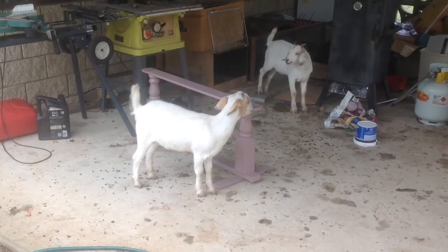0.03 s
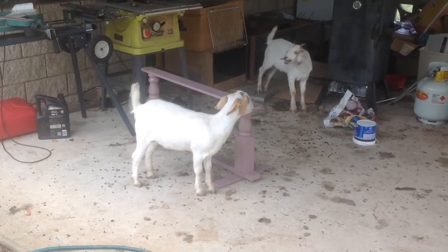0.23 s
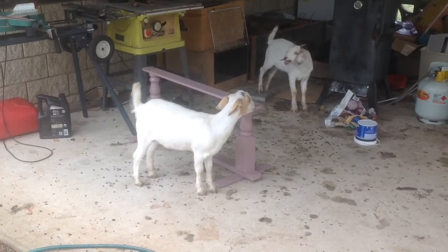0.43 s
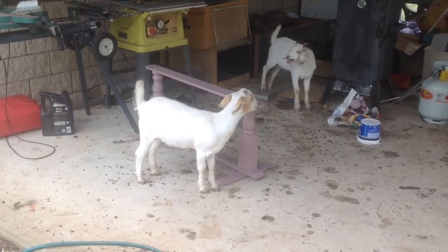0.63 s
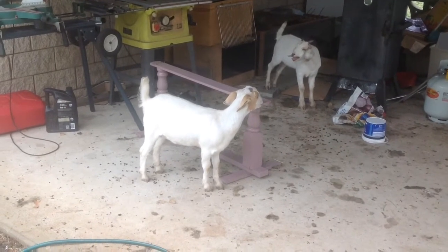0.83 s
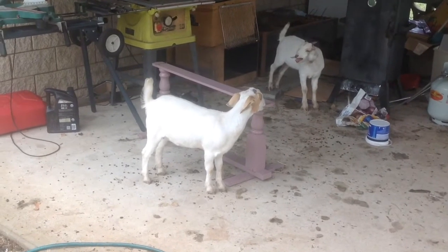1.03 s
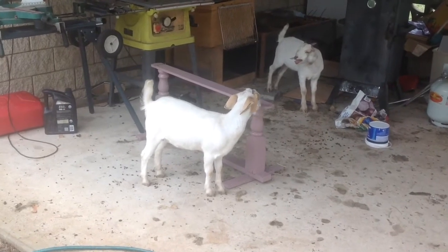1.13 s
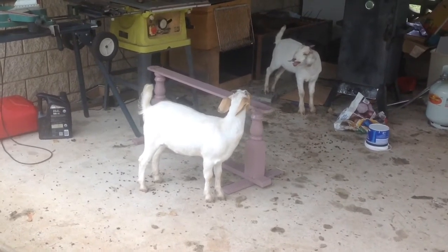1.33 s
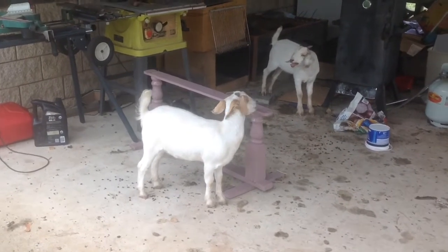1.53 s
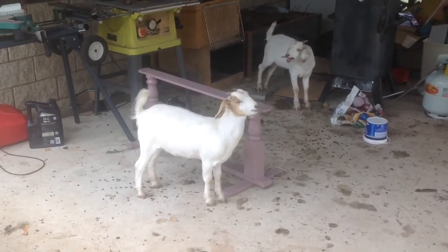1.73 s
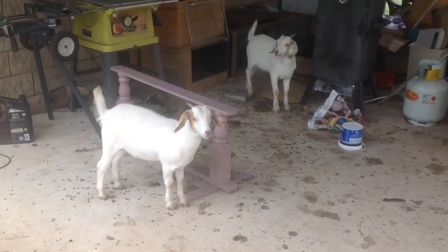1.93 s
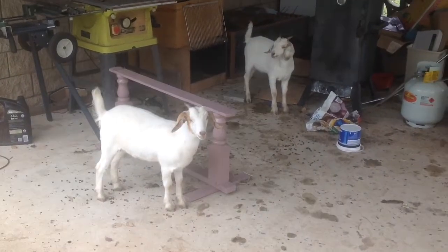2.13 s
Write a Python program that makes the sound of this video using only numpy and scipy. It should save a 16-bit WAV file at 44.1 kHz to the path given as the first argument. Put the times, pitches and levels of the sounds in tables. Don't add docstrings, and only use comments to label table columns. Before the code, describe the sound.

Close, slightly overloaded camera sound of a goat bleating like a scream, hoarse and squealing before breaking into a sustained nasal wail, with short wall reflections, faint machine hum, then a sudden drop to near quiet and a faint rasp.

```python
import sys
import numpy as np
from scipy import signal
from scipy.fft import rfft, irfft, next_fast_len
from scipy.io import wavfile
from scipy.ndimage import uniform_filter1d, map_coordinates

SR = 44100
rng = np.random.default_rng(int(sys.argv[2]) if len(sys.argv) > 2 else 0)


def wav_out(sig):
    wavfile.write(sys.argv[1], SR, np.round(np.clip(np.atleast_2d(sig).T, -1, 1) * 32767).astype(np.int16))


def volts_from_decibels(level):
    exponent = np.asarray(level, float) / 20
    return 10 ** exponent


N = 97020


def unit(x):
    return x / np.sqrt(np.mean(x ** 2) + 1e-20)


def along(points, hz):
    f, value = np.transpose(points)
    return np.interp(np.log(hz + 1), np.log(f + 1), value)


def curves(rows):
    s, *columns = np.transpose(rows)
    return [np.interp(np.arange(N) / SR, s, column) for column in columns]


def wobble(rate):
    knots = rng.standard_normal(int(N * rate / SR) + 4)
    return map_coordinates(knots, [np.arange(N) * rate / SR])


def filtered(x, response):
    m = next_fast_len(N + SR // 2)
    return irfft(rfft(x, m) * response(np.fft.rfftfreq(m, 1 / SR)), m)[..., :N]


def peak(f, hz, width):
    return 1j * f * width / (hz * hz - f * f + 1j * f * width)


def turning(hz, rough=0):
    jitter = 0.0012 * wobble(60.1) + 0.044 * rough * wobble(110)
    return 2 * np.pi * np.cumsum(hz * (1 + jitter)) / SR


def folds(phase, levels_db, rough=0, drift_db=3):
    pulses = 0
    for k, db in enumerate(levels_db):
        drift = drift_db * (k > 1) * (wobble(13.94) + 0.64 * wobble(45.01))
        lag = k * k * (0.303 + 0.00078 * wobble(100))
        pulses = pulses + volts_from_decibels(db + drift) * np.cos((k + 1) * phase + lag)
    scatter = 1 + 0.57 * rough * wobble(130)
    shimmer = volts_from_decibels(0.5 * wobble(39.68))
    return unit(pulses) * scatter * shimmer


def room():
    # f/Hz, level/dB per Hz
    room_colour = [(35, -105), (60, -88), (102, -9), (142, -10.5), (236, -4.5), (272, -18), (1290, -14),
                   (1700, -20.5), (15400, -39.5)]
    noise = unit(filtered(rng.standard_normal(N), lambda f: volts_from_decibels(along(room_colour, f)))) * volts_from_decibels(wobble(12))
    hum_hz = 117 + 2 * wobble(4.3)
    hum = np.sin(2 * np.pi * np.cumsum(hum_hz) / SR) * volts_from_decibels(4.1 * wobble(11))
    return volts_from_decibels(-39) * noise + volts_from_decibels(-43) * hum


def echo():
    # f/Hz, level/dB per Hz
    echo_colour = [(150, -60), (250, -11.5), (842, -7.5), (1040, -15.5), (1260, -22), (2330, -43),
                   (9000, -50), (11700, -77.5), (19800, -120)]
    t60 = 3.85
    tail = unit(filtered(rng.standard_normal(N), lambda f: volts_from_decibels(along(echo_colour, f))))
    return tail * volts_from_decibels(-44.5 - 60 * np.arange(N) / SR / t60 + 5.64 * wobble(15))


def air():
    # t/s, level/dB
    air_rows = [
        (.1, -75),
        (.18, -55.5),
        (.3, -52),
        (.6, -46),
        (.78, -55),
        (1.0, -50.5),
        (1.2, -57.5),
        (1.35, -60.5),
        (1.93, -57.5),
    ]
    # f/Hz, width/Hz, gain
    teeth = [(5630, 380, 1.22), (6560, 670, 1.24), (8130, 910, 1.07)]
    hiss = rng.standard_normal(N) * volts_from_decibels(curves(air_rows)[0] + 1.2 * wobble(40.13))

    def mouth_front(f):
        bands = sum(gain * peak(f, hz, width) for hz, width, gain in teeth)
        return 6 * peak(f, 6220, 6400) ** 2 * (1 + bands)

    return filtered(hiss, mouth_front)


def rasp(wail_phase):
    # t/s, level/dB, mouth ring/dB, throat pinch/dB
    rasp_rows = [(.1, -60, 5, 0), (.14, -38, 8, 0), (.2, -26, 0, 2), (.26, -22, 0, 4), (.36, -23, 0, 5),
                 (.48, -25, -8, 0), (.58, -30, -3, 0), (.7, -33, -3, 5), (.8, -40, -3, 0), (.9, -34, -4, 2),
                 (1.0, -28, 3, 5), (1.13, -28, 2, 8), (1.17, -48, 3, 0), (1.28, -35, 2, 0),
                 (1.37, -37, 0, 0), (1.42, -47, 3, 0), (1.64, -47, 3, 0), (1.72, -37, 2, 0),
                 (1.93, -44, 5, 0)]
    db, ring_db, pinch_db = curves(rasp_rows)
    gate = 1 + 0.89 * np.cos(wail_phase)
    grain = 1 + 0.38 * np.cos(turning(np.full(N, 157.7), 3.48))
    breath = volts_from_decibels(db) * unit(rng.standard_normal(N) * gate * grain)
    return breath, breath * volts_from_decibels(pinch_db), breath * volts_from_decibels(ring_db)


def throat(source):
    # f/Hz, width/Hz, level/dB
    resonances = [(2384, 187, 5.5), (3330, 440, 3.5), (4140, 720, -0.5), (6080, 1500, -14.5),
                  (6950, 1600, -19.5), (8780, 930, -27.5), (11100, 1200, -23)]

    def shape(f):
        tube = sum((-1) ** k * volts_from_decibels(db) * peak(f, hz, width) for k, (hz, width, db) in enumerate(resonances))
        body = volts_from_decibels(-4) * peak(f, 1266, 570)
        pocket = 1 - 0.76 * peak(f, 4570, 240)
        return (tube - body) * pocket

    return 3 * filtered(source, shape)


def pinch(source):
    return 3 * filtered(source, lambda f: peak(f, 2420, 380) ** 2)


def mouth(source):
    return -3 * filtered(source, lambda f: peak(f, 1084, 235) ** 2)


def onset():
    # t/s, creak f/Hz, creak level/dB, whistle f/Hz, whistle level/dB
    onset_rows = [
        (.105, 570, -67, 844, -49),
        (.125, 575, -30.5, 860, -30.5),
        (.155, 588, -34.5, 992.4, -21),
        (.185, 624.5, -23, 1030, -21),
        (.25, 619.4, -24, 1072, -17),
        (.33, 646, -22, 1101, -21),
        (.38, 650, -46, 1090, -26),
        (.47, 637, -77, 1045, -27),
        (.62, 631, -84, 1038, -39),
        (.8, 636, -74, 1054, -35.5),
    ]
    hz, db, whistle_hz, whistle_db = curves(onset_rows)
    creak = volts_from_decibels(db) * folds(turning(hz, 0.2), [3, -1.5, -19.5, 4.5, -3], 0.68, drift_db=2.0)
    return creak + volts_from_decibels(whistle_db) * folds(turning(whistle_hz, 0.49), [0], 0.91)


def squeal():
    # t/s, f/Hz, level/dB, flutter depth/0-1, fundamental over the rest/dB
    squeal_rows = [(.11, 860, -90, .1, 30), (.13, 860, -62, .1, 30), (.17, 860, -75, .1, 25),
                   (.3, 853, -60, .3, 18), (.34, 850, -33, .5, 7), (.44, 852, -25, .8, 4),
                   (.54, 859, -21, .7, 2), (.6, 870, -22, .6, 0), (.68, 872, -23, .4, 3),
                   (.75, 875, -24, .3, 3), (.78, 881, -24, .15, -12), (.83, 884, -22, .2, -4),
                   (.9, 884, -22, .3, -2), (.95, 882, -22, .3, -12), (.99, 878, -26, .3, -6),
                   (1.03, 876, -90, .4, 0)]
    # t/s, f/Hz
    beat_rows = [(.3, 506), (.5, 507.3), (.57, 506), (.64, 502), (.85, 503.3), (1, 497)]
    overtones_db = [-3.5, -0.5, 1, -15, -20, -26, -26.5]
    flutter = [(1, 1), (2, -1), (2, 1), (2, 2), (3, 1), (4, -1), (4, 1), (5, -1), (7, -1), (4, -2)]
    flutter_db = [-5.5, -3.5, -0.5, -5.5, -6.5, -3, -5, -1, -16, -2]
    hz, db, depth, low_db = curves(squeal_rows)
    high = turning(hz, 0.028)
    beat = turning(curves(beat_rows)[0], 0.045)
    sides = 0
    for (k, away), side_db in zip(flutter, flutter_db):
        sides = sides + volts_from_decibels(side_db + 4.1 * wobble(24.64)) * np.cos(k * high + away * beat)
    fundamental = 0.8 * volts_from_decibels(low_db) * np.cos(high)
    upper = folds(high, np.r_[-60, overtones_db], 0.38, drift_db=2.55)
    return volts_from_decibels(db) * (fundamental + upper + depth * sides) + volts_from_decibels(db - 22) * np.cos(beat)


def wail():
    # t/s, f/Hz
    pitch_rows = [(.97, 535.4), (1.02, 506.4), (1.12, 496.3), (1.2, 507.3), (1.27, 511.7), (1.345, 542),
                  (1.44, 520.7), (1.52, 505.2), (1.64, 522.6), (1.76, 528.9), (1.87, 514.8), (1.95, 499.1)]
    # t/s, level/dB, mouth ring/dB, roughness/0-1, throat pinch/dB
    wail_rows = [(.95, -29, 6, 0.48, 3.5), (.99, -24.5, 8.5, 0.63, 1.5), (1.012, -22.5, 20.5, 0.46, -6),
                 (1.021, -26, 12, 0.5, 0), (1.031, -23.5, 20, 0.3, 4.5), (1.045, -23.5, 13.5, 0.49, 1.5),
                 (1.058, -26, 19.5, .5, 7.5), (1.077, -30.5, 8.5, 0.6, -2.5),
                 (1.087, -27.5, 20.5, 0.55, -4.5), (1.105, -21, 8.5, 0.7, -0.5), (1.125, -25, 13, .5, 0.5),
                 (1.145, -22.5, 11.5, 0.17, 0.5), (1.17, -22, 16, 0.1, 11), (1.26, -21, 13, 0.1, -3.5),
                 (1.31, -29.5, 25.5, 0.08, -12), (1.385, -29, 25.5, 0.11, -9), (1.44, -21.5, 15, .05, -6),
                 (1.458, -23, 15.5, 0.14, -6), (1.471, -20.5, -7, 0.03, -8), (1.485, -24.5, 18, 0.08, 0),
                 (1.55, -24.5, 17, .03, -4), (1.61, -18, 11, .05, -3), (1.68, -23.5, 17, 0.1, -8.5),
                 (1.75, -21, 15, 0.12, -21), (1.85, -21, 14.5, 0.15, -10), (1.9, -22, 15, 0, -19),
                 (1.93, -27.5, 12, 0.04, -16)]
    overtones_db = [2.5, 3.5, -4, 3, 2.5, 4, -5.5, -9.5, -14, -6.5]
    db, ring_db, rough, squeeze_db = curves(wail_rows)
    rough = np.clip(rough, 0, 1)
    phase = turning(uniform_filter1d(curves(pitch_rows)[0], SR // 30), 0.654 * rough)
    breaks = np.clip((np.arange(N) / SR - 0.95) / 0.034, 0, 1)
    levels_db = np.r_[overtones_db, overtones_db[-1] + 0.0061 * np.arange(18)]
    pulses = breaks * volts_from_decibels(db) * folds(phase, levels_db, rough)
    uneven = pulses * (1 + rough * np.cos(phase / 3 + wobble(25)))
    slap = breaks * rough * volts_from_decibels(np.maximum(db, -25) + 1.8 * wobble(50)) * np.cos(phase)
    return phase, uneven, uneven * volts_from_decibels(squeeze_db - 3), slap, pulses * volts_from_decibels(ring_db)


def goat():
    phase, uneven, squeezed, slap, ringing = wail()
    breath, pinched_breath, mouth_breath = rasp(phase)
    begun = np.clip((np.arange(N) / SR - 0.105) / 0.0055, 0, 1)
    voice = onset() + squeal() + slap + throat(uneven + breath)
    voice = voice + pinch(pinched_breath + squeezed) + air() + mouth(mouth_breath)
    return begun * voice, mouth(ringing)


def garage(x):
    # f/Hz, time to fall 60 dB/s
    decay = [(300, 0.93), (1500, 0.52), (8000, 0.59)]
    hz, t, z = signal.stft(rng.standard_normal(SR // 2), SR, nperseg=256)
    fall = volts_from_decibels(-60 * t / along(decay, hz)[:, None])
    tail = signal.istft(z * fall, SR, nperseg=256)[1]
    return signal.fftconvolve(np.pad(x, (300, 0)), tail / np.linalg.norm(tail))[:N]


def closing_swell(rise):
    return volts_from_decibels(-37.5) * rise ** 2 * unit(throat(rng.standard_normal(N)))


def scene():
    t = np.arange(N) / SR
    change_s, rise_s = 1.963, 2.138
    voice, ring = goat()
    call = voice + ring + garage(volts_from_decibels(-5) * voice + volts_from_decibels(-22) * ring)
    loud = np.sqrt(abs(uniform_filter1d(call ** 2, SR // 5)))
    floor = room()
    before = (call + echo() + floor / (1 + loud)) * np.clip((change_s - t) / 0.017, 0, 1)
    rise = np.clip((t - rise_s) / 0.081, 0, 1)
    quiet_room = floor * np.clip((t - change_s) / 0.03, 0, 1) * volts_from_decibels(-9.5 + 8 * rise)
    return (before + quiet_room + closing_swell(rise))[None]


def band_limit(x):
    return signal.sosfilt(signal.butter(12, 15600, fs=SR, output="sos"), x)


def record(dry):
    cut_hz, dull_hz, dull_db, top_hz = 89, 11670, -9, 15600
    ceiling, hardness = 0.99, 10

    def microphone(f):
        bass_cut = (1j * f / (cut_hz + 1j * f)) ** 4
        return bass_cut * volts_from_decibels(dull_db / (1 + (dull_hz / (f + 1)) ** 12))

    x = filtered(dry, microphone)
    x = x / (1 + abs(x / ceiling) ** hardness) ** (1 / hardness)
    x = filtered(x, lambda f: (1j * f / (cut_hz / 2 + 1j * f)) ** 4 * (f < top_hz))
    return band_limit(x)


dry = scene()
out = record(dry)
wav_out(out)
```